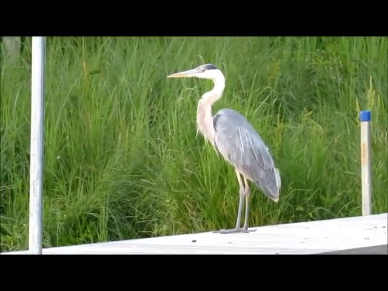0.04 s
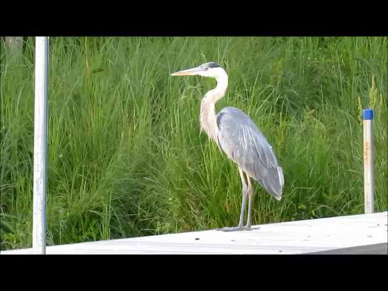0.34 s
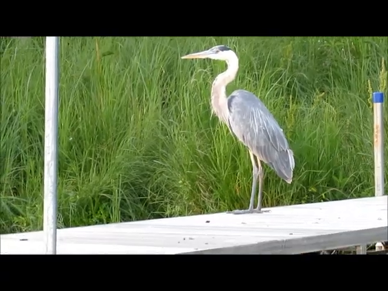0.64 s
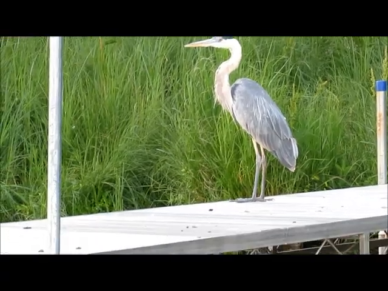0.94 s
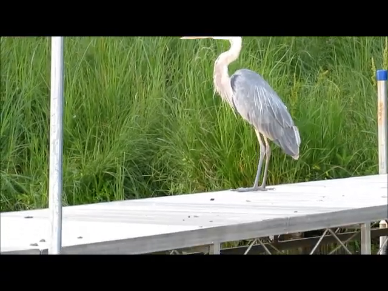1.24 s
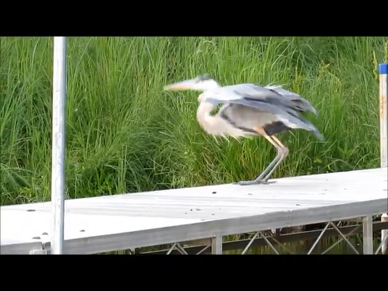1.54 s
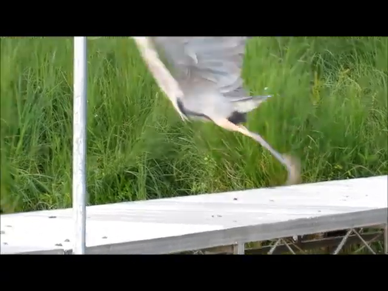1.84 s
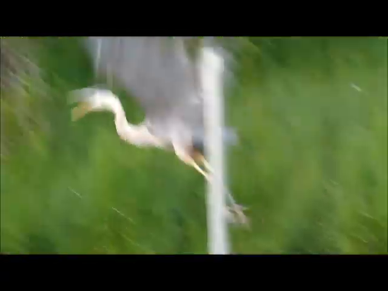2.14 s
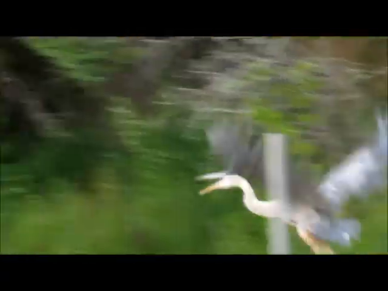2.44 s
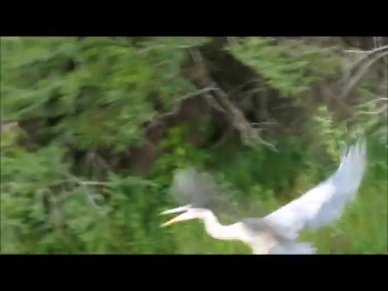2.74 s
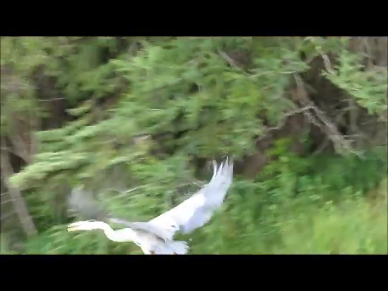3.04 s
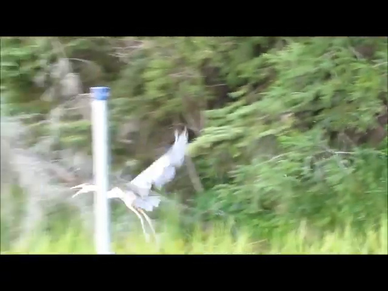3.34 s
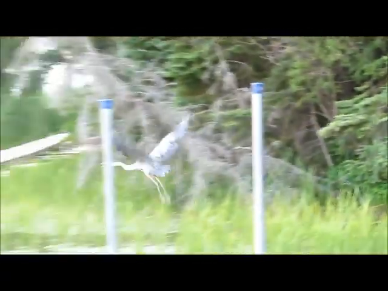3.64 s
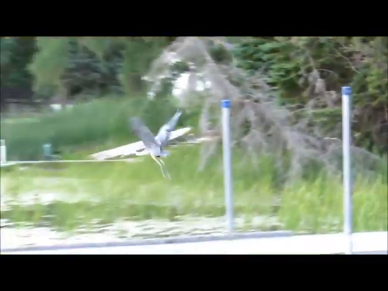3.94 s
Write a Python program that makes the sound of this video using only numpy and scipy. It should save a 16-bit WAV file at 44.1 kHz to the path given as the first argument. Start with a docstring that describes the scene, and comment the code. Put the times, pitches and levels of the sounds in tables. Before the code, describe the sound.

A heron squawks harshly several times as it takes off and flies away.

```python
"""A heron gives six harsh squawks as it flies off over water, after springing from a dock with a wing crack.
Each squawk is an irregular rattle of pulses and rushing air in the throat's resonances.
The wooded shore answers faintly. Far birds trill and repeat a falling call over a quiet outdoor hiss,
which swells with a few soft bumps as the heron leaves."""
import sys
import numpy as np
from scipy import signal
from scipy.fft import rfft, irfft
from scipy.io import wavfile
from scipy.ndimage import uniform_filter1d

SR = 44100
rng = np.random.default_rng(int(sys.argv[2]) if len(sys.argv) > 2 else 0)


def dump(signal):
    """Clip the signal to [-1, 1] and save it as 16-bit WAV at the path in sys.argv[1]."""
    limited = np.clip(np.atleast_2d(signal).T, -1, 1)
    pcm = np.round(limited * 32767).astype(np.int16)
    wavfile.write(sys.argv[1], SR, pcm)


N = 176400
T = np.arange(N) / SR

# One envelope per squawk. Each row: time in seconds, relative level in dB.
SQUAWK_ENVELOPES = [
    [(1.77, -43.5), (1.87, -37), (1.898, -29), (2.102, -23), (2.112, -25), (2.196, -17), (2.232, -23.5),
     (2.328, -22.5), (2.34, -20), (2.438, -23), (2.474, -19.5), (2.536, -24.5), (2.572, -23.5), (2.63, -32)],
    [(2.635, -60), (2.647, -32), (2.689, -33), (2.725, -42)],
    [(2.748, -31), (2.761, -31), (2.769, -23), (2.79, -32), (2.85, -28), (2.93, -31.5), (2.98, -37.5),
     (3.07, -43)],
    [(3.18, -50), (3.22, -32), (3.23, -41.5), (3.254, -32), (3.3, -27.5), (3.318, -34), (3.335, -38)],
    [(3.335, -35.5), (3.38, -24), (3.47, -23), (3.59, -24.5), (3.63, -37.5), (3.72, -44)],
    [(3.81, -33), (3.816, -49), (3.846, -32), (3.994, -31), (4.0, -25)],
]
# High resonance. Each row: time in seconds, centre in Hz.
SHRILL_GLIDE = [(1.9, 4940), (2.06, 4660), (2.19, 4450), (2.45, 4360), (2.7, 4920), (3.5, 4596),
                (4.0, 4650)]


def heron(gain_db=-1, shrill_db=-23, effort_from_db=-16):
    """Syrinx drives throat; effort adds a shrill edge to the louder squawks."""
    source = syrinx()
    voice = throat(source)
    shrill_hz, = curves(SHRILL_GLIDE)
    shrill = gliding_band(source, shrill_hz, width_hz=330)
    out = 0
    for envelope in SQUAWK_ENVELOPES:
        db, = curves(envelope)
        strain = from_db(shrill_db + .25 * (db - effort_from_db))
        out += gate(envelope[0][0], envelope[-1][0]) * from_db(db) * (voice + strain * shrill)
    return from_db(gain_db) * out


# Voice pulses. Each row: time in seconds, nominal rate in Hz.
PULSE_RATES = [(1.85, 133.6), (2.1, 144), (2.19, 278), (2.3, 167), (2.47, 270), (2.56, 96), (2.66, 63.5),
               (2.72, 79), (2.77, 280), (2.83, 107.4), (3.0, 95.3), (3.22, 120), (3.4, 190), (3.6, 114.4),
               (3.9, 86)]


def syrinx(jitter=.2, spread_db=2, puff_s=.0024, puff_db=2):
    """Uneven pulses, each with a puff of turbulence; faster pulses carry more rushing air."""
    rate_hz, = curves(PULSE_RATES)
    cycles = np.floor(np.cumsum(rate_hz * np.exp(jitter * drift(120))) / SR)
    pulses = np.diff(cycles, prepend=0) * from_db(spread_db * noise()) / np.sqrt(rate_hz)
    puffs = signal.lfilter([1], [1, -np.exp(-1 / (puff_s * SR))], pulses) * noise()
    air = from_db(3.5 + np.log2(rate_hz / 154)) * noise()
    return hold_level(unit_rms(pulses) + from_db(puff_db) * unit_rms(puffs) + air)


# Ringing note. Each row: time in seconds, pitch in Hz.
NOTE_GLIDE = [(1.78, 645), (1.92, 547), (2.04, 582), (2.18, 762), (2.42, 709), (2.52, 537), (2.68, 618.7),
              (2.78, 710), (2.93, 553), (3.2, 554), (3.3, 652), (3.39, 700), (3.53, 554), (3.84, 561.7),
              (4.0, 649.7)]
# Each row: time in seconds, level of the note over the low resonances in dB.
NOTE_PROMINENCE = [(1.8, -1), (2.05, -9.5), (2.15, 29), (2.23, -2.5), (2.7, -11.5), (3.2, -12.5), (3.3, 11),
                   (3.38, -5), (3.6, -46), (3.95, 3)]
# Throat and beak resonances. Each row: centre in Hz, width in Hz, relative level in dB.
LOW_MODES = [(586, 190, 12.5), (797, 175, 12)]
MID_MODES = [(1100, 147, 9), (1198, 26, 4.5)]
BEAK_MODES = [(1487, 640, 13.5), (1810, 245, 8)]
# Upper resonance and broad rasp. Each row: frequency in Hz, relative gain in dB.
UPPER_SPECTRUM = [(900, -37), (1600, -21), (1950, 3), (2300, 4), (2650, -0.5), (2900, 0.5), (3250, -17.5),
                  (3550, -12.5), (4000, -28.5), (6000, -53)]
RASP_SPECTRUM = [(60, -35), (170, 0), (290, 10.5), (420, 8), (1000, -9.5), (3000, 17), (4700, -4.5),
                 (6000, -5), (8500, -13), (12000, -14.5), (15000, -38)]
# Each row: time in seconds, then low, middle, beak and upper shares in dB.
THROAT_MIX = [(1.82, -2, -5.5, -17, -14), (1.9, -5, -1.5, -6, 2), (2.03, -11.5, -3.5, -3, -3),
              (2.13, -8, -11.5, -5.5, -1.5), (2.19, -13, -8, -2.5, -3.5), (2.36, -14.5, -4.5, -1.5, -5.5),
              (2.48, -13.5, -11, 2.5, -3.5), (2.6, -21.5, -7, -13.5, -9.5), (2.67, -1, 0.5, -4, 2),
              (2.77, -10, -7.5, -4, 0), (2.9, -5, -2, -6.5, -3.5), (3.05, -6, -12, -5.5, -5.5),
              (3.21, 2.5, -23, -3.5, 1.5), (3.3, -5.5, -14, -9, -5), (3.38, -9, -12, -6, -3.5),
              (3.56, -10, -13, -10.5, -10), (3.68, -21, -2, -6, -3), (3.85, -3.5, -10, -9, -4),
              (4.0, -8, -8.5, -5.5, -4)]


def throat(source, note_width_hz=49.5, overtone_db=-9, peak_db=-1.5, rasp_db=-15):
    """Four resonance bands over a rasp; their balance shifts as the beak opens and closes."""
    note_hz, = curves(NOTE_GLIDE)
    note_db, = curves(NOTE_PROMINENCE)
    note = from_db(note_db) * hold_level(gliding_band(source, note_hz, note_width_hz))
    overtone = from_db(overtone_db) * gliding_band(source, 2 * note_hz, note_width_hz)
    peak_hz = 2065 * np.exp(.042 * drift(7.3))
    peak = from_db(peak_db) * gliding_band(source, peak_hz, width_hz=206)
    low = unit_rms(resonate(source, LOW_MODES)) + note
    middle = unit_rms(resonate(source, MID_MODES)) + overtone
    beak = resonate(source, BEAK_MODES)
    upper = unit_rms(colour(source, UPPER_SPECTRUM)) + peak
    bands = (low, middle, beak, upper)
    voice = sum(from_db(db) * hold_level(band) for db, band in zip(curves(THROAT_MIX), bands))
    return voice + from_db(rasp_db) * unit_rms(colour(source, RASP_SPECTRUM))


# Wing cracks and feather ticks. Each row: start in seconds, relative level in dB.
WING_CRACKS = [(1.338, -53), (1.7141, -41.5), (1.734, -45), (1.7444, -44), (1.867, -40), (2.109, -39),
               (2.6844, -39)]
# Feathers sweeping air. Each row: peak time in seconds, relative level in dB, rise and decay in seconds.
WING_SWISHES = [(1.739, -40, 0.006, 0.028), (1.91, -41.5, 0.029, 0.036), (2.19, -41, 0.021, 0.1),
                (2.5, -48, .04, 0.15)]
# Each row: frequency in Hz, relative gain in dB.
FEATHER_SPECTRUM = [(300, -15), (1500, -10.5), (3300, -11), (4500, -2.5), (6500, -16), (9000, -16),
                    (13000, -18.5), (15500, -41)]


def wings(flutter_db=3.5):
    """Feathers crack as the wings open, then swish through the first strokes."""
    cracks = sum(burst(start_s + .00096, db, rise_s=.000081, decay_s=.0032) for start_s, db in WING_CRACKS)
    swishes = sum(burst(*row) for row in WING_SWISHES) * from_db(flutter_db * drift(337))
    return (cracks + swishes) * coloured_noise(FEATHER_SPECTRUM)


# Each row: peak time in seconds, level in dB.
BUMP_HITS = [(2.743, -32.5), (2.87, -52), (2.969, -41), (3.035, -48), (3.177, -46)]
# Each row: frequency in Hz, relative gain in dB.
BUMP_SPECTRUM = [(40, -20), (110, 2), (300, 3), (500, 4), (900, -11), (2000, -23), (8000, -38)]


def bumps():
    """Short dull bumps close by, with separate noise in each ear."""
    envelope = sum(burst(peak_s, db, rise_s=.0011, decay_s=.0068) for peak_s, db in BUMP_HITS)
    return envelope * np.array([coloured_noise(BUMP_SPECTRUM) for _ in range(2)])


# Each row: start in seconds, relative level in dB.
FAR_BIRD_CALLS = [(-.2, -56.5), (.335, -54), (0.941, -56.5), (1.537, -56.5)]
# One call. Each row: time since start in seconds, pitch in Hz, gain in dB.
CALL_CONTOUR = [(0, 1400, -1), (.05, 1750, -7), (.09, 1696, -3), (.15, 1450, 1.5), (.24, 1300, 0),
                (.31, 1230, -8)]


def far_bird(breath_db=-1, husk_hz=1240, husk_width_hz=380, husk_db=2.5):
    """A far bird's falling calls: a rough tone in a band of noise, with a husky onset."""
    husk = resonate(noise(), [(husk_hz, husk_width_hz, husk_db)])
    out = 0
    for start_s, db in FAR_BIRD_CALLS:
        hz, contour_db = curves(CALL_CONTOUR, start_s)
        tone = wavering_tone(hz, waver=.0383)
        breath = from_db(breath_db) * gliding_band(noise(), hz, width_hz=332)
        envelope = gate(start_s, start_s + CALL_CONTOUR[-1][0]) * from_db(contour_db)
        onset = husk * swell(start_s + .05, width_s=.046)
        out += from_db(db) * (envelope * (tone + breath) + onset)
    return out


# Each row: start and end in seconds, pitch in Hz, level in dB, waver as a fraction of pitch.
FAR_TONES = [(-.1, 0.25, 818, -61, 0.02), (0.21, 0.678, 818, -58, 0.0068),
             (1.014, 1.421, 815, -61.5, 0.0092)]


def far_tones(flicker_db=1.5):
    """Faint distant tones that flicker in level."""
    out = 0
    for start_s, end_s, hz, db, waver in FAR_TONES:
        envelope = gate(start_s, end_s, edge_s=.04) * from_db(db + flicker_db * drift(25))
        out += envelope * wavering_tone(hz, waver)
    return out


# Each row: peak time in seconds, level in dB.
HIGH_CHIRPS = [(2.96, -49), (3.46, -49), (3.954, -47.5)]


def chirps(centre_hz=10278, width_hz=100.2):
    """Thin high chirps of narrow-band noise."""
    band = hold_level(resonate(noise(), [(centre_hz, width_hz, 0)]))
    return band * sum(from_db(db) * swell(peak_s, width_s=.018) for peak_s, db in HIGH_CHIRPS)


def trill(pitch_hz=3385, level_db=-60, pips_per_s=28.6, peak_s=.195, end_s=.43):
    """A small far bird's run of pips, swelling and fading."""
    pips = np.abs(np.cos(np.pi * pips_per_s * (T - peak_s)))
    envelope = from_db(level_db) * swell(peak_s, width_s=.35) * gate(-1, end_s)
    return envelope * pips * wavering_tone(pitch_hz, waver=.0057)


def shore_echo(x, gain_db=-9.5, delay_s=.02, t60_s=.74):
    """Diffuse echo from reeds and trees, partly alike in both ears."""
    tail = burst(delay_s, db=0, rise_s=.012, decay_s=t60_s / np.log(1000))
    shared = noise()
    responses = [unit_rms(tail * (shared + 1.13 * noise())) / np.sqrt(N) for _ in range(2)]
    return from_db(gain_db) * np.array([signal.fftconvolve(x, response)[:N] for response in responses])


# Hiss spectra. Each row: frequency in Hz, relative gain in dB.
STEADY_SPECTRUM = [(18, -42), (30, -15), (122, -3), (150, -5.5), (185, -4), (320, -4), (404, -3),
                   (448, -5.5), (662, -3), (735, -3.5), (794, -2), (859, -4), (1370, -6), (2030, -12.5),
                   (3980, -17), (9640, -23.5), (15000, -32.5)]
SWELL_SPECTRUM = [(30, -14), (70, -1.5), (150, -1.5), (400, 0), (1000, 2.5), (2200, -6.5), (5000, -13.5),
                  (8500, -19), (11500, -16.5), (15000, -36)]
# Stereo width. Each row: frequency in Hz, side over mid in dB.
STEADY_WIDTH = [(40, 7), (150, 9.5), (400, 9), (1000, 2), (3000, 1.5), (10000, 0)]
SWELL_WIDTH = [(40, 0.5), (150, 1), (400, -14), (1000, -5.5), (3000, -4), (10000, 1)]
# Each row: time in seconds, mid level in dB.
SWELL_LEVELS = [(0, -80), (1.75, -69), (2.1, -48), (2.65, -50), (2.95, -43), (3.5, -41.5), (4.0, -44)]


def outdoor_hiss(steady_db=-51.5):
    """A quiet steady hiss, and a second that swells as the heron leaves."""
    swell_db, = curves(SWELL_LEVELS)
    steady = from_db(steady_db) * wide_noise(STEADY_SPECTRUM, STEADY_WIDTH)
    return steady + from_db(swell_db) * wide_noise(SWELL_SPECTRUM, SWELL_WIDTH)


def from_db(db):
    """Decibels to gain."""
    return 10 ** (np.asarray(db) / 20)


def unit_rms(x):
    """Scale to unit rms."""
    return x / np.sqrt(np.mean(x ** 2) + 1e-20)


def hold_level(x, samples=1100):
    """Hold the short-term rms at 1."""
    return x / np.sqrt(uniform_filter1d(uniform_filter1d(x ** 2, samples), samples) + 1e-9)


def curves(rows, start_s=0):
    """A timed table's value columns at every sample."""
    times_s, *columns = np.transpose(rows)
    return [np.interp(T - start_s, times_s, column) for column in columns]


def gate(start_s, end_s, edge_s=.024):
    """One between two times, with soft edges."""
    return np.clip((T - start_s) / edge_s + .5, 0, 1) * np.clip((end_s - T) / edge_s + .5, 0, 1)


def burst(peak_s, db, rise_s, decay_s):
    """Envelope with exponential rise and fall."""
    return from_db(db) * np.exp(-np.maximum((peak_s - T) / rise_s, (T - peak_s) / decay_s))


def swell(peak_s, width_s):
    """Gaussian envelope."""
    return np.exp(-((T - peak_s) / width_s) ** 2)


def noise():
    """White noise."""
    return rng.standard_normal(N)


def coloured_noise(spectrum):
    """Shaped noise of unit rms."""
    return unit_rms(colour(noise(), spectrum))


def wide_noise(spectrum, width):
    """Stereo noise whose mid has unit rms."""
    mid = coloured_noise(spectrum)
    side = colour(coloured_noise(spectrum), width)
    return np.array([mid + side, mid - side])


def drift(hz):
    """Low-passed random motion of unit rms."""
    lowpass = signal.butter(2, hz, fs=SR, output="sos")
    return unit_rms(signal.sosfilt(lowpass, rng.standard_normal(N + SR))[SR:])


def wavering_tone(hz, waver):
    """Unit-rms sine with unsteady pitch."""
    return np.sqrt(2) * np.sin(2 * np.pi * np.cumsum(hz * (1 + waver * drift(100))) / SR)


def colour(x, spectrum):
    """Minimum-phase filter through (Hz, dB) points."""
    size = 2 * N
    hz, db = np.transpose(spectrum)
    bins_hz = np.arange(N + 1) * SR / size
    gain = from_db(np.interp(np.log(bins_hz + 1), np.log(hz), db))
    cepstrum = irfft(np.log(gain))
    cepstrum[1:N] *= 2
    cepstrum[N + 1:] = 0
    return irfft(rfft(x, size) * np.exp(rfft(cepstrum)))[:N]


def resonate(x, modes):
    """Parallel band-passes of alternating sign, each at its own level."""
    out = 0
    for k, (hz, width_hz, db) in enumerate(modes):
        band = signal.butter(2, [hz - width_hz / 2, hz + width_hz / 2], "band", fs=SR, output="sos")
        out += (-1) ** k * from_db(db) * unit_rms(signal.sosfilt(band, x))
    return out


def gliding_band(x, hz, width_hz):
    """Moving resonance: shift to 0 Hz, low-pass, shift back."""
    carrier = np.exp(2j * np.pi * np.cumsum(hz) / SR)
    lowpass = signal.butter(2, width_hz / 2, fs=SR, output="sos")
    return unit_rms((signal.sosfilt(lowpass, x / carrier) * carrier).real)


# Each row: time in seconds, left over right in dB.
HERON_BALANCE = [(1.8, -1), (2.3, -1.2), (2.8, -1), (3.3, -0.9), (4.0, -1.3)]


def scene():
    """Heron, far birds and their echo over the lakeside background."""
    balance_db, = curves(HERON_BALANCE)
    pan = from_db(np.array([balance_db, -balance_db]) / 2)
    bird = heron() + wings()
    hiss = outdoor_hiss()
    far = far_bird() + far_tones() + chirps() + trill()
    return pan * bird + far + shore_echo(bird + far) + bumps() + hiss


# Microphone dips. Each row: centre in Hz, width in Hz.
MIC_NOTCHES = [(3930, 310), (7950, 200)]


def record(dry, cutoff_hz=14800):
    """Two narrow dips in the microphone's response, then a steep low-pass."""
    for hz, width_hz in MIC_NOTCHES:
        dry = signal.lfilter(*signal.iirnotch(hz, hz / width_hz, fs=SR), dry)
    return signal.sosfilt(signal.ellip(10, .1, 80, cutoff_hz, fs=SR, output="sos"), dry)


dry = scene()
out = record(dry)
dump(out)
```